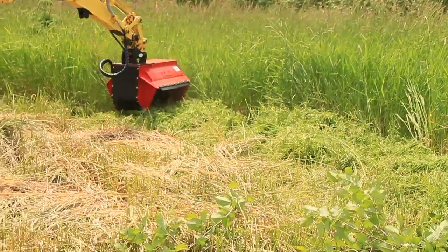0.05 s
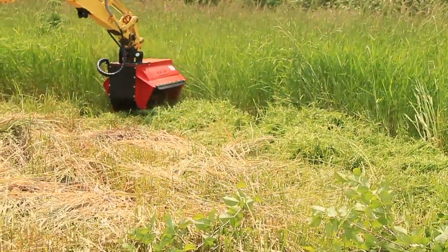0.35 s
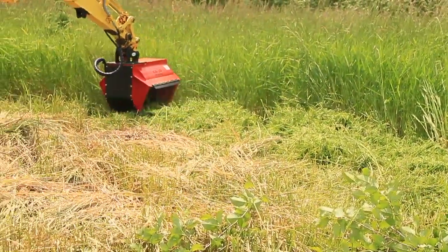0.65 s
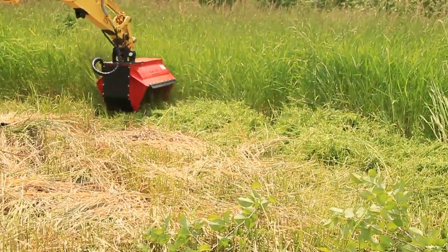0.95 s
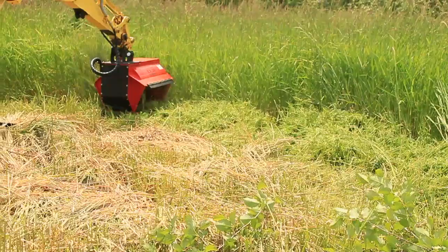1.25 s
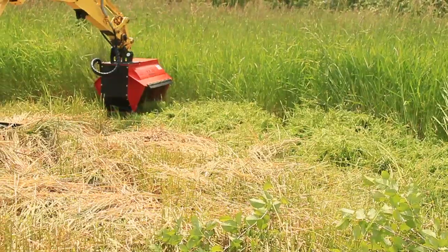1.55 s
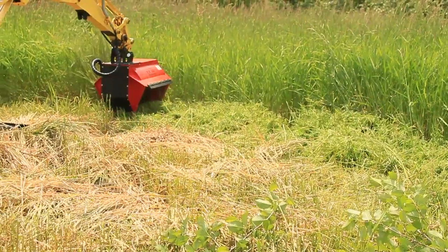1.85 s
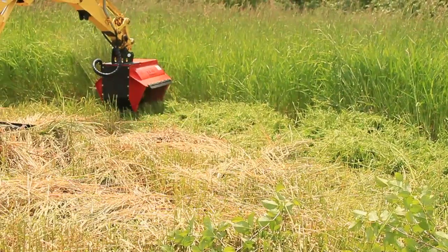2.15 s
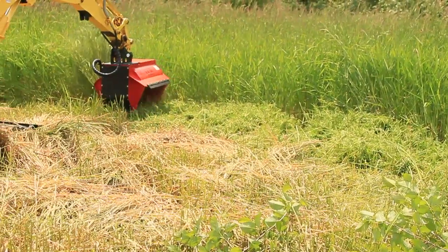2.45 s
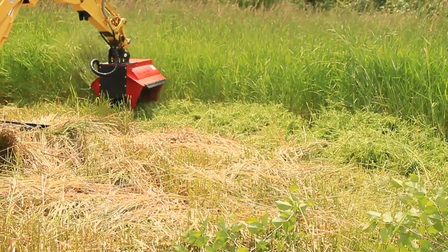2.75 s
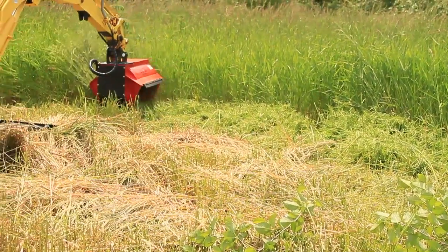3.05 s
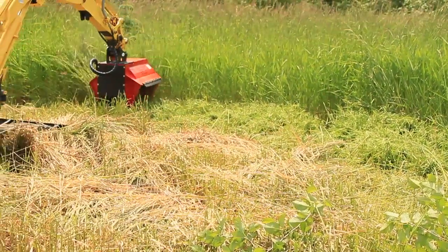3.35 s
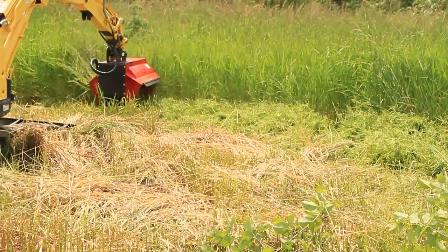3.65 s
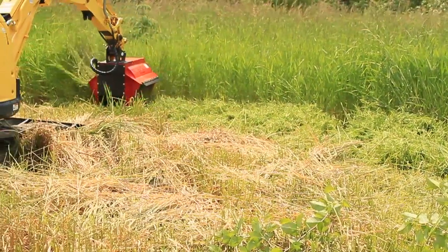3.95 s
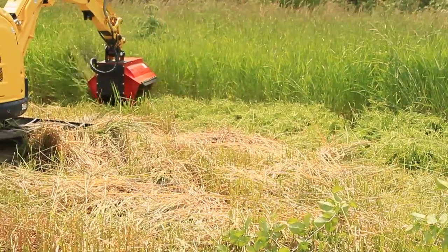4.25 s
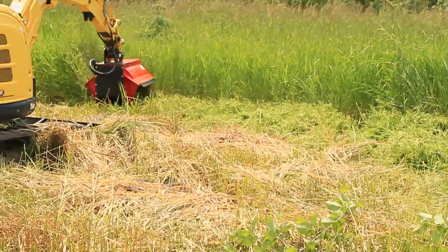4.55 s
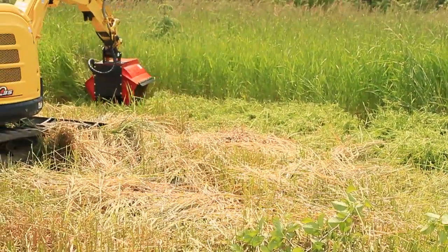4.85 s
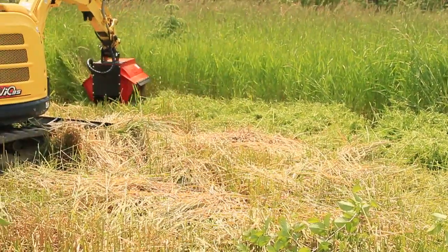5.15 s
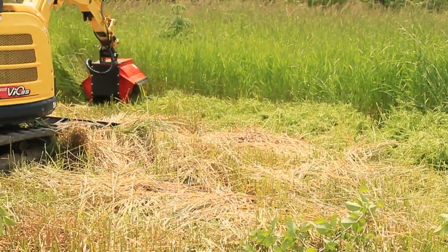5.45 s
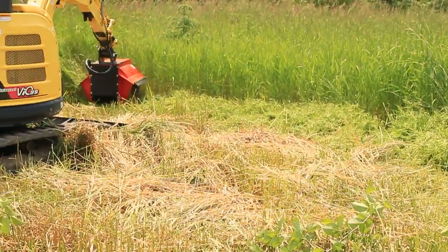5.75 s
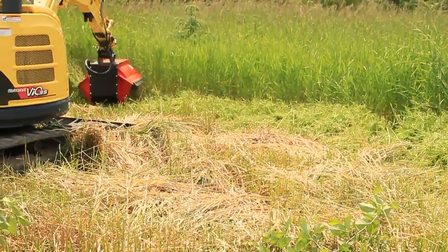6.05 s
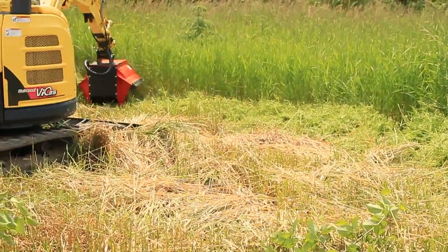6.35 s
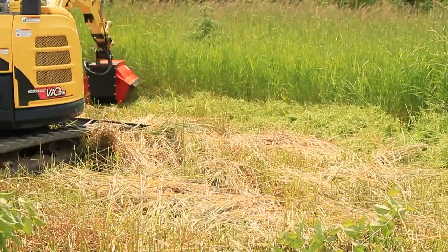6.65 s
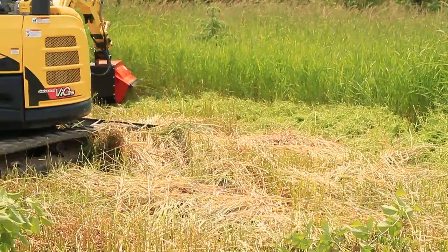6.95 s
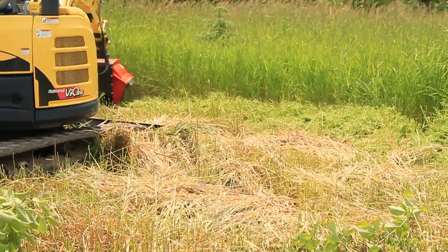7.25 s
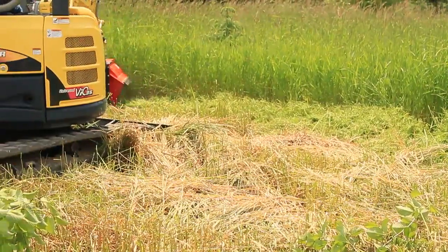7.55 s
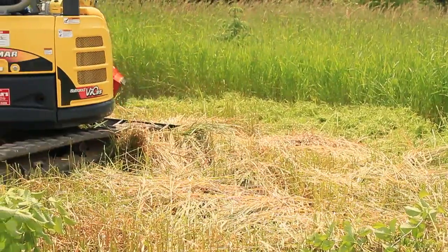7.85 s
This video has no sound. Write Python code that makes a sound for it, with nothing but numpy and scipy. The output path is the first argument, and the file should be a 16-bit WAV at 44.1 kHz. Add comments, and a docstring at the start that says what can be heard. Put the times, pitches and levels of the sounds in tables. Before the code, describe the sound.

A small excavator's diesel hums and clatters while its mower hisses through grass, tearing tufts and snapping stalks.

```python
"""Mowing tall grass with an excavator

A small excavator swings a flail mower (spinning, hinged blades) through grass in an open field.
Its three-cylinder diesel hums and clatters, a fan and a hydraulic motor whine, and air rushes in
the mower's hood. Grass shreds into a crackling hiss, tufts tear and stalks snap. At each loud snap
an automatic volume control turns everything down, then lets the steady machine swell back."""
import sys
import numpy as np
from scipy import signal
from scipy.fft import rfft, irfft
from scipy.io import wavfile
from scipy.ndimage import uniform_filter1d, minimum_filter1d

SR = 44100
rng = np.random.default_rng(int(sys.argv[2]) if len(sys.argv) > 2 else 0)


def log_audio(samples):
    """Write samples as a 16-bit WAV file to the path given in sys.argv[1]."""
    # one column per channel
    frames = np.atleast_2d(samples).T
    # limit to full scale, then quantise
    limited = np.clip(frames, -1, 1)
    pcm = np.round(limited * 32767).astype(np.int16)
    wavfile.write(sys.argv[1], SR, pcm)


N = 357210
TIME = np.arange(N) / SR


def undb(db):
    """Turn decibels into a number to multiply by."""
    return 10 ** (np.asarray(db) / 20)


def unit(x):
    """Scale a signal to an average power of 1."""
    return x / np.sqrt(np.mean(x ** 2))


def curves(table):
    """Join the rows of a table with straight lines in time, one curve per value column."""
    times, *columns = np.transpose(table)
    return [np.interp(TIME, times, column) for column in columns]


def walk(rate):
    """A random wobble of size about 1 that changes course `rate` times a second."""
    knots = rng.standard_normal(int(N / SR * rate) + 2)
    return unit(np.interp(TIME * rate, np.arange(len(knots)), knots))


def colour(x, points):
    """Shape the tone by (frequency [Hz], level [dB]) points; white noise keeps its power."""
    hz, db = np.transpose(points)
    freqs = np.maximum(np.arange(N // 2 + 1) * SR / N, 1)
    gains = unit(undb(np.interp(np.log(freqs), np.log(hz), db)))
    return irfft(rfft(x) * gains, N)


def resonate(x, hz, width):
    """Make a signal ring around one pitch; `width` is in Hz."""
    return signal.lfilter(*signal.iirpeak(hz, hz / width, fs=SR), x)


def turns(hz, wander):
    """Count the turns of something whose speed drifts a little."""
    return np.cumsum(hz * (1 + wander * walk(10))) / SR


def crackle(per_s, spread_db):
    """Random clicks, mostly small with a few large ones."""
    breaks = rng.random(N) < per_s / SR
    size = undb(spread_db * np.minimum(rng.standard_normal(N), 2.6))
    return unit(breaks * size * np.sign(rng.standard_normal(N)))


def strikes(table):
    """One click for each (time [s], level [dB]) row."""
    times, db = np.transpose(table)
    return np.bincount((times * SR).astype(int), undb(db), N)[:N]


def fade(hits, decay_s):
    """Every hit jumps up at once and dies away."""
    return signal.lfilter([1], [1, -np.exp(-1 / (decay_s * SR))], hits + 1e-18)


def splinter(cracks):
    """Follow each crack with a tiny burst of splintering noise."""
    tails = .13 * fade(cracks, decay_s=.0003) + .035 * fade(cracks, decay_s=.002)
    return cracks + np.r_[0, tails[:-1]] * rng.standard_normal(N)


def diesel():
    """Three cylinders fire in turn: the exhaust hums, the casing clatters and the block rings."""
    # exhaust tones: (multiple of the engine's cycle rate, level [dB])
    exhaust_tones = [(3, -10.5), (6, 2), (15, -15.5), (18, -13.5), (20, -10), (21, -10.5), (23, -11),
                     (24, -10), (27, -7.5), (30, -13.5), (33, -17.5), (36, -17), (40, -21), (42, -14.5),
                     (50, -21.5)]
    # tone of the casing's low clatter: (frequency [Hz], level [dB])
    clatter_shape = [(30, -39), (75, -6.5), (110, -4), (155, 4), (215, -1), (330, -2.5), (400, 1),
                     (520, 3.5), (720, -6), (980, 1), (1100, -34), (3000, -19)]
    # tone of the cylinders' hard knock: (frequency [Hz], level [dB])
    knock_shape = [(700, -35), (1060, -7), (1280, 3.5), (1450, -5), (2300, -3.5), (3300, -11),
                   (8000, -18.5), (16000, -17)]
    # ringing of the engine block: (pitch [Hz], width [Hz], level [dB])
    block_rings = [(2900, 40, -12), (3056, 25, -4), (3420, 56, -11)]
    cycle = turns(hz=20.2, wander=.0012)
    hum = 0
    for multiple, db in exhaust_tones:
        flutter_db = 2.4 * min(multiple / 20, 1) ** 2 * walk(10)  # high tones waver more
        phase = 2 * np.pi * (round(multiple) * cycle + rng.random())
        hum = hum + undb(db + flutter_db) * np.sqrt(2) * np.cos(phase)
    strength = 1 + .22 * np.cos(2 * np.pi * cycle)  # one cylinder is stronger
    firing = (.25 + np.exp(-(3 * cycle % 1) / .3)) * strength  # three fading blows per cycle
    blows = unit(firing * rng.standard_normal(N))
    clatter = colour(unit((1.3 + firing) * rng.standard_normal(N)), clatter_shape)
    block = unit(sum(undb(db) * resonate(blows, hz, width) for hz, width, db in block_rings))
    return undb(-2.5) * hum + undb(0.5) * clatter + colour(blows, knock_shape) + undb(-13.5) * block


def fan():
    """The cooling fan's blades chop the air into a tone and another an octave higher."""
    phase = 2 * np.pi * turns(hz=277.7, wander=.0012)
    tone = undb(-9.5 + 2.5 * walk(6)) * np.sin(phase)
    octave = undb(-8.5 + 2.8 * walk(10)) * np.sin(2 * phase)
    return tone + octave


def hydraulics():
    """The pistons of the oil-driven motor whine; the pitch sags when it works hard."""
    # the motor's whine: (time [s], pitch [Hz], level [dB])
    whine = [(0, 350.4, -1), (.25, 352, -2.5), (.6, 345, -13), (3.4, 369.6, -38), (4, 356, -12),
             (5.4, 352, -5.5), (6.4, 356, -10.5), (7.1, 351.5, -24)]
    hz, db = curves(whine)
    return undb(db) * np.sqrt(2) * np.sin(2 * np.pi * turns(hz, wander=0.0028))


def hood():
    """Air and cuttings are flung against the steel hood in uneven gulps."""
    # the rush, swelling at each bite into the grass: (time [s], level [dB])
    rush_levels = [(0, -22.5), (.27, -19.5), (.6, -22), (1.1, -23.5), (1.3, -21.5), (1.56, -21),
                   (1.85, -24.5), (2.5, -24.5), (2.95, -24), (3.15, -20), (3.3, -24), (4.1, -22.5),
                   (4.85, -25.5), (5.7, -25), (6.02, -24.5), (6.5, -25), (7.3, -25.5), (8.1, -25)]
    # tone of the hood: (frequency [Hz], level [dB])
    hood_shape = [(130, -18), (400, -7), (720, -4.5), (950, 3.5), (1100, 1), (2400, 1), (3600, -2.5),
                  (8000, -8), (16000, -11)]
    rush_db = curves(rush_levels)[0]
    patter = crackle(per_s=7000, spread_db=2.5)
    gulps = undb(0.66 * walk(30) + 1.53 * walk(170))
    return undb(rush_db) * colour(unit(patter * gulps), hood_shape)


def shredding(hiss_db):
    """Grass breaks in clumps, loudest as a row of flails comes round."""
    sweep = 1 + .13 * np.cos(2 * np.pi * turns(hz=44.2, wander=.025))
    bites = (rng.random(N) < 150 / SR) * rng.random(N)  # about 150 a second
    clumps = 1 + 1.8 * fade(bites, decay_s=0.003)
    return undb(hiss_db) * unit(sweep * clumps * crackle(per_s=14000, spread_db=6.0))


def thin_stems(hiss_db):
    """Thin stems click apart at random, about 40 a second, louder in thicker grass."""
    return (rng.random(N) < 40 / SR) * undb(hiss_db + 22.0 - 9.2 * rng.random(N))


def tufts():
    """Each tuft tears in a swarm of tiny breaks that builds quickly and dies away."""
    # tufts torn off: (time [s], level [dB])
    tears = [(0.074, -1.5), (0.876, -4), (1.185, -8), (1.62, -1.0), (1.843, -8.0), (2.014, -10),
             (2.082, -7.5), (2.484, -0.5), (2.579, 1.5), (2.69, -4), (3.265, 0), (3.328, 1), (3.916, 5),
             (4.131, 5.5), (4.319, -5), (4.449, -3.5), (4.727, -1.5), (4.919, -1), (5.025, 1.5),
             (5.112, -3.0), (5.48, 0.5), (5.561, 2), (5.897, -4), (5.991, -6), (6.12, -2), (6.442, -2),
             (6.688, 1.5), (6.851, -2.5), (7.101, -4), (7.175, 2.5), (7.234, 0.5), (7.538, -5.5),
             (7.679, -4.5), (7.765, 0), (7.885, -5)]
    pulls = strikes(tears)
    swarm = fade(pulls, decay_s=0.0061) - fade(pulls, decay_s=0.0014)
    return swarm * unit(crackle(per_s=20000, spread_db=3.5) * undb(0.84 * walk(600)))


def woody_stems():
    """Splitting fibres make a hollow stem ring briefly."""
    # hollow stems cracking: (time [s], pitch [Hz], level [dB])
    cracks = [(0.147, 5640, -9), (1.342, 6000, -7.5), (1.777, 5460.0, -8.5), (2.221, 4000.0, -14.5),
              (2.675, 3000.0, -9), (3.772, 4810.0, -6), (4.559, 3295.0, -6), (4.921, 2590.0, -18),
              (5.675, 3280.0, -12), (7.234, 5200.0, -19), (7.764, 5030, -12)]
    fibres = rng.standard_normal(N)
    return sum(fade(strikes([(time, db)]), decay_s=0.002) * unit(resonate(fibres, hz, width=1600))
               for time, hz, db in cracks)


def thick_stalks():
    """Each thick stalk breaks with one sharp crack."""
    # stalks snapping: (time [s], level [dB])
    snaps = [(0.325, 7.5), (0.371, 8.5), (0.45, 9), (0.503, 12.5), (0.652, 12), (0.921, 8), (0.935, 8),
             (1.007, 11.5), (1.343, 6.5), (1.528, 6.5), (1.599, 5.0), (1.621, 8.5), (1.777, 9), (2.021, 9),
             (2.185, 7.0), (2.223, 9.5), (2.288, 11), (2.354, 11.5), (2.484, 11), (2.502, 12.5),
             (2.579, 16), (2.693, 14.5), (3.172, 10.5), (3.271, -2), (3.329, 10), (3.368, 12),
             (3.462, 14.5), (3.548, 13.5), (3.596, 16.5), (3.774, 13), (3.801, 16), (3.853, 13),
             (3.906, 15.5), (3.971, 14), (4.0, 16.5), (4.117, 17.5), (4.469, 14), (4.558, 15.0), (4.923, 6),
             (4.935, 14), (5.026, 13), (5.036, 16.5), (5.194, 16.5), (6.376, 2.5), (6.446, 4.5), (6.62, 10),
             (6.693, 1), (6.987, 9), (7.139, 8), (7.176, 8.0)]
    return strikes(snaps)


def scene():
    """The machine runs steadily and the grass crackles over it, with no echo in the open field."""
    # the hiss, louder where the flails meet more grass: (time [s], level [dB])
    hiss_levels = [(0, -24.5), (.42, -19), (.6, -22.5), (.88, -18), (1.1, -20.5), (1.7, -18.5),
                   (2.13, -23.5), (2.85, -20), (3.25, -16.5), (4.1, -14.5), (4.28, -18), (4.67, -16),
                   (5.35, -21.5), (5.7, -20.5), (6.42, -17.5), (7.1, -19.5), (7.32, -20.5), (8.1, -22)]
    # bright tone of breaking grass: (frequency [Hz], level [dB])
    grass_shape = [(700, -19), (2200, -20.5), (4200, -7.5), (8500, -3.5), (10500, -0.5), (13000, 1),
                   (16000, 0)]
    # the engine grows louder as the excavator swings towards the listener
    swing_from_s, swing_db_per_s = 6.5, 1.07
    engine_db = -29.5 + swing_db_per_s * np.maximum(TIME - swing_from_s, 0)
    machine = undb(engine_db) * (diesel() + fan() + hydraulics()) + hood()
    hiss_db = curves(hiss_levels)[0]
    cutting = shredding(hiss_db) + tufts() + splinter(thin_stems(hiss_db) + thick_stalks())
    return (machine + colour(cutting, grass_shape) + woody_stems())[None]


def volume_control(x):
    """The volume drops just before a loud crack to hold it down, then climbs back steadily."""
    ceiling_db, max_gain_db, recovery_db_per_s = -11.5, -6.5, 14.5
    average_s, drop_s = 0.0008, .004
    power = fade(x ** 2, decay_s=average_s) / (average_s * SR)
    allowed_db = ceiling_db - 10 * np.log10(power)
    climb_db = recovery_db_per_s * TIME
    # max_gain_db is the limit at the start; the limit rises with the climb
    gain_db = climb_db + np.minimum.accumulate(np.minimum(allowed_db - climb_db, max_gain_db), axis=-1)
    window = int(drop_s * SR)
    smooth_db = uniform_filter1d(minimum_filter1d(gain_db, window), window)
    return x * undb(smooth_db)


def record(dry):
    """Control the volume, cut the highest treble and keep the signal between -1 and 1."""
    top_hz = 15850
    treble_cut = signal.ellip(12, .1, 80, top_hz, fs=SR, output="sos")
    return np.clip(signal.sosfilt(treble_cut, volume_control(dry)), -1, 1)


dry = scene()
out = record(dry)
log_audio(out)
```